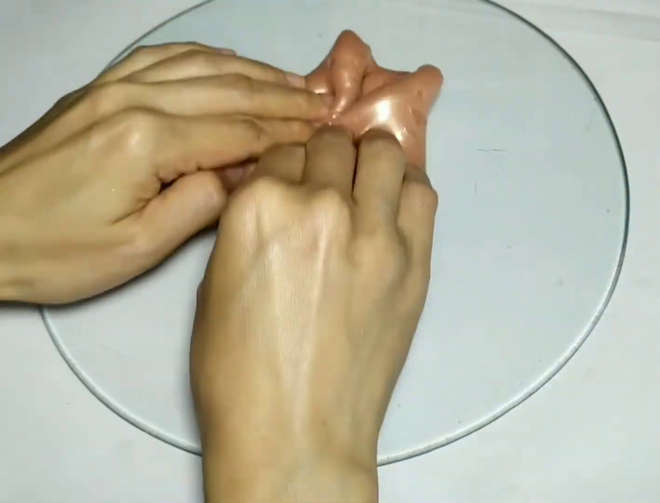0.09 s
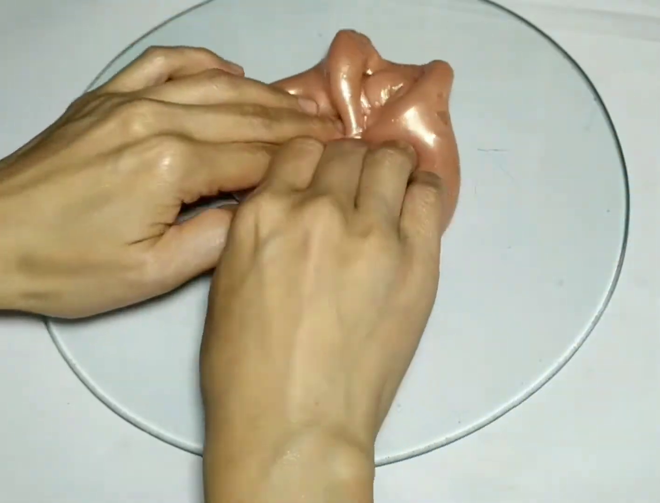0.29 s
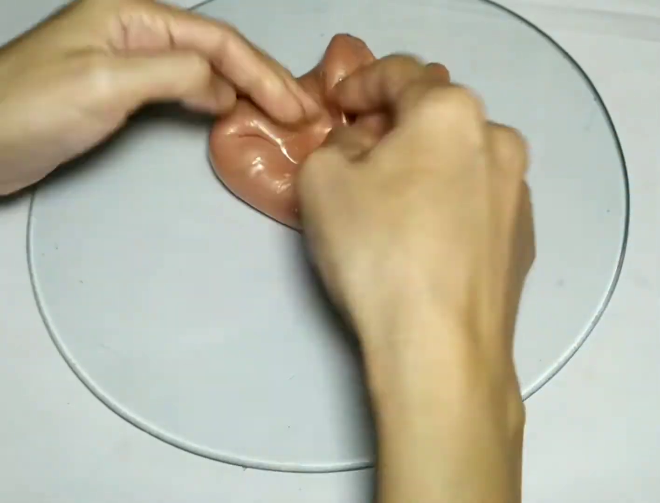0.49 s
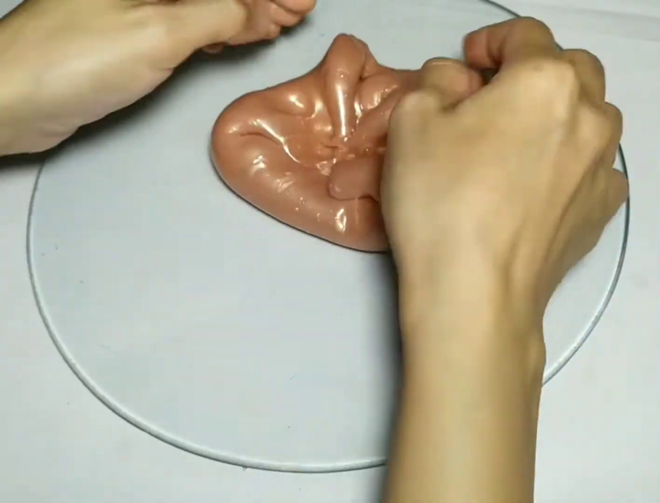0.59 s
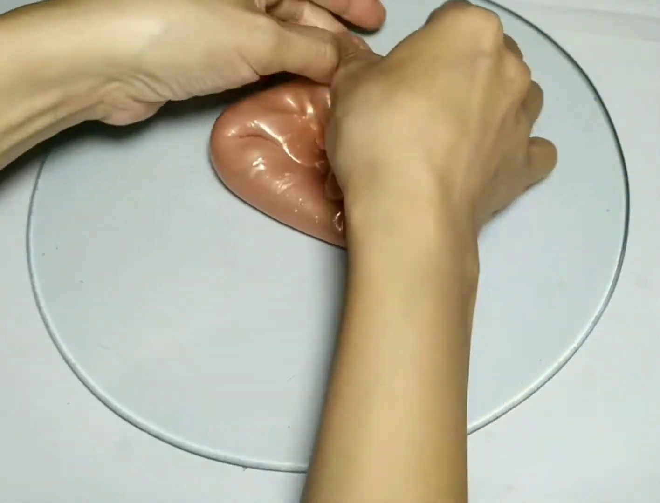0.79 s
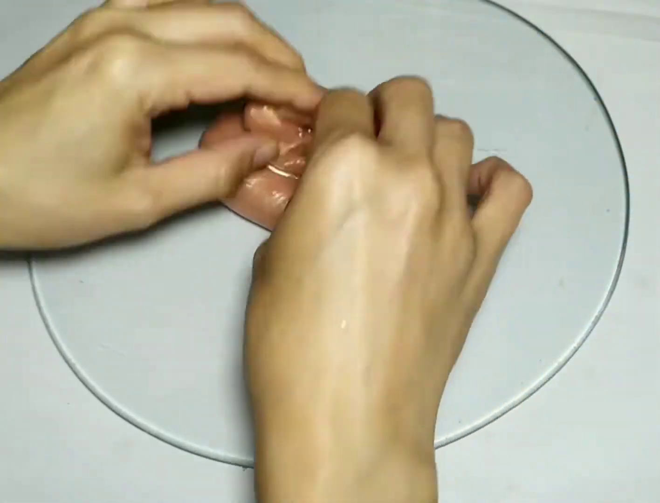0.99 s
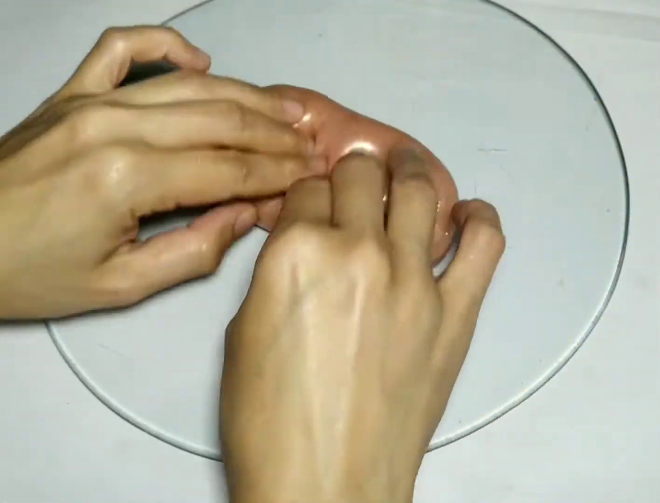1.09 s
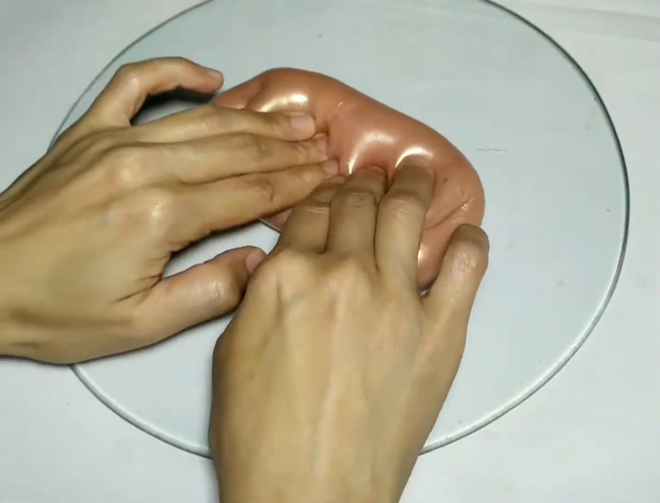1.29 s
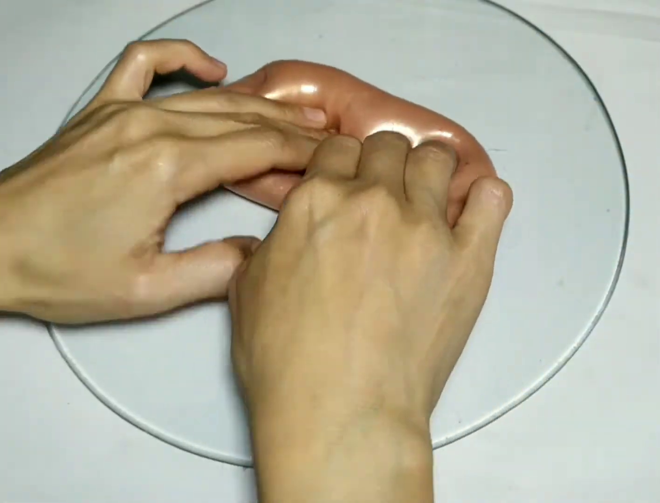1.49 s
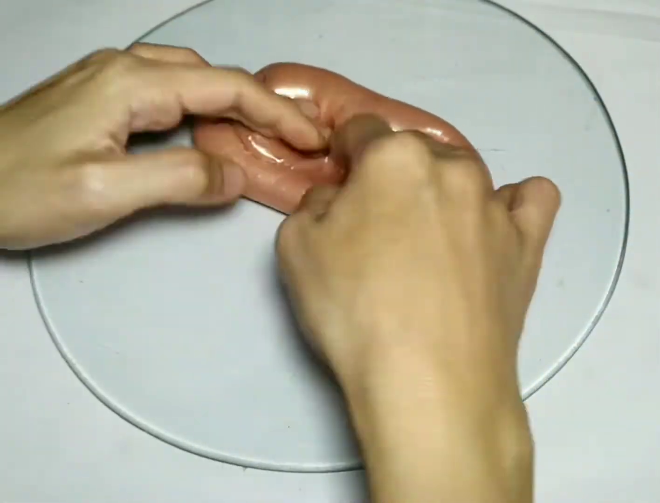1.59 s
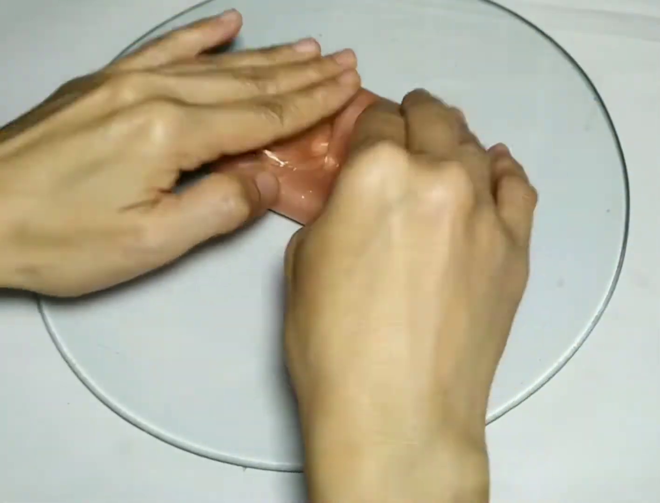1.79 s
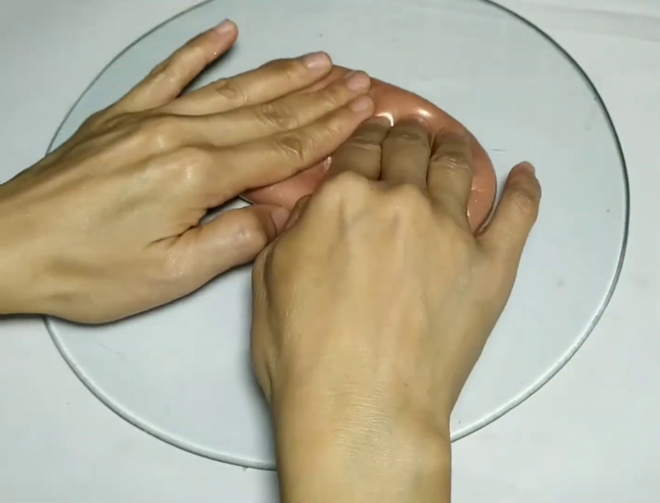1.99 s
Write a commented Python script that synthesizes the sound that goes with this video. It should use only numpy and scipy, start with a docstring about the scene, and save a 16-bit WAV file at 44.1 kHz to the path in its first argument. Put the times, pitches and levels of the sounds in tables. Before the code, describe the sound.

Hands fold gooey slime on a glass plate, with tiny sharp clicks and a fat wet pop

```python
"""A low, humming rumble, faint hiss and tiny ticks run throughout, while hands knead sticky slime on a glass plate.
Tiny bubbles snap as short noise sprays with a dull knock; larger air pockets pop as brief rising tones.
Squelches are crackle that swells and dies away, and the hand lands with soft low thuds, one with a knock.
The small, live room answers with a few separate echoes and a fading tail of noise."""
import sys
import numpy as np
from scipy import signal
from scipy.fft import rfft, irfft
from scipy.io import wavfile

SR = 44100
rng = np.random.default_rng(int(sys.argv[2]) if len(sys.argv) > 2 else 0)


def store_pcm(level_fs):
    """Save levels as 16-bit WAV."""
    pcm = np.round(np.clip(level_fs, -1, 1) * 32767).astype(np.int16)
    wavfile.write(sys.argv[1], SR, np.atleast_2d(pcm).T)


N = 92610  # samples, 2.1 s


def undb(db):
    """Turn decibels into a gain."""
    return 10 ** (np.asarray(db) / 20)


def unit(x):
    """Scale to an average strength (rms) of 1."""
    return x / np.sqrt(np.mean(x ** 2) + 1e-30)


def over_hz(table, hz):
    """Read a (pitch, value) table at any pitch, with straight lines on a log-pitch axis."""
    table_hz, values = np.array(table, float).T
    return np.interp(np.log(np.maximum(hz, 1)), np.log(table_hz), values)


def freqs(x):
    """List the frequencies in the spectrum of x, none below 1 Hz."""
    return np.maximum(np.fft.rfftfreq(x.shape[-1], 1 / SR), 1)


def colour(x, table):
    """Make each pitch louder or softer as the table says."""
    gain = undb(over_hz(table, freqs(x)))
    return irfft(rfft(x) * gain, x.shape[-1])


def band(x, hz, octaves):
    """Keep a bell-shaped band around a pitch, at rms 1."""
    distance = np.log2(freqs(x) / hz) / octaves
    return unit(irfft(rfft(x) * np.exp(-.5 * distance ** 2), x.shape[-1]))


def fade(t, t60):
    """Die away smoothly, falling 60 dB in t60 seconds."""
    return np.exp(-np.log(1000) * t / t60)


def pan(x, db):
    """Make the left side louder than the right by db."""
    return x * undb(np.array([[db], [-db]]) / 2)


def add(out, x, start):
    """Mix x into out from a start time in seconds."""
    i = int(round(start * SR))
    n = min(x.shape[-1], N - i)
    out[:, i:i + n] += x[..., :n]


def crackle(rate, spread_db):
    """Scatter tiny one-sample ruptures of uneven strength, rate per second."""
    size = undb(spread_db * np.minimum(rng.exponential(size=N), 5))
    happens = rng.random(N) < rate / SR
    return happens * size * np.sign(rng.standard_normal(N))


# Tone balance of the low rumble: pitch_hz, relative level_db (per Hz)
RUMBLE_COLOUR = [(20, -39.5), (35, -15.5), (50, -20.5), (66, -1), (90, -9.5), (130, -11.5), (170, -8),
                 (230, -16), (330, -23), (500, -31.5), (900, -45), (2500, -72)]
# Tone balance of the hiss: pitch_hz, relative level_db (per Hz)
HISS_COLOUR = [(100, 7.5), (1000, 3), (2000, -1), (5000, -4), (9500, -2), (15000, -7), (16500, -11.5)]
# Hums, each a narrow band of noise: pitch_hz, level_db, width_hz
HUMS = [(65, -54, 6), (163, -63, 6)]
RUMBLE_DB, HISS_DB = -53, -65
RUMBLE_SIDE_DB = -13  # left-right difference, against the shared rumble


def background():
    """Low room rumble, two hums that waver because they are narrow noise, and hiss."""
    mid, side = unit(colour(rng.standard_normal((2, N)), RUMBLE_COLOUR))
    out = undb(RUMBLE_DB) * (mid + undb(RUMBLE_SIDE_DB) * np.array([side, -side]))
    for hz, db, width in HUMS:
        noise = rng.standard_normal(N)
        peak = 1 / (1 + ((freqs(noise) - hz) / width) ** 2)
        out = out + undb(db) * unit(irfft(rfft(noise) * peak, N))
    hiss = unit(colour(rng.standard_normal((2, N)), HISS_COLOUR))
    return out + undb(HISS_DB) * hiss


# How long the room rings at each pitch: pitch_hz, t60_s
ROOM_T60 = [(300, 0.29), (1300, 0.4), (3500, 0.34), (9000, 0.27), (16000, .28)]
# Tone balance of the room's tail: pitch_hz, level_db
ROOM_COLOUR = [(100, -9.5), (300, -0.5), (500, 0), (1100, -10.5), (2000, -5), (4500, -0.5), (9000, -3.5),
               (16000, -1)]
ROOM_DB, ROOM_DELAY_S, ROOM_BUILD_S = -6, .004, 0.002


def diffuse():
    """The blurred tail of many reflections: noise bands that fade at their own speeds."""
    t = np.arange(SR // 2) / SR
    noise, tail = rng.standard_normal((2, len(t))), np.zeros((2, N))
    build = 1 - np.exp(-t / ROOM_BUILD_S)
    for k, (_, t60) in enumerate(ROOM_T60):
        # Each band blends into its neighbours
        blend = [(hz, j == k) for j, (hz, _) in enumerate(ROOM_T60)]
        share = over_hz(blend, freqs(noise))
        ringing = irfft(rfft(noise) * share, len(t))
        add(tail, ringing * fade(t, t60) * build, ROOM_DELAY_S)
    tail = tail / np.sqrt(np.sum(tail ** 2))
    return colour(tail, ROOM_COLOUR) * undb(ROOM_DB)


# Separate echoes from nearby walls: delay_s, left_db, right_db
ECHOES = [(.009, -24, -20.5), (0.011, -18, -27), (0.0143, -17.5, -15.5), (.0174, -12.5, -14),
          (.0348, -21, -23)]
# Tone balance of those echoes: pitch_hz, level_db
ECHO_COLOUR = [(500, -14), (3000, -1.5), (7000, -2.5), (16000, -7)]


def through(x, response):
    """Send a sound through the first half second of a room response."""
    return signal.fftconvolve(x, response[:, :SR // 2], axes=1)[:, :N]


def room(dry):
    """Sound arrives directly, then off the walls, then as a tail fed from both sides."""
    early = np.zeros((2, N))
    for delay, left_db, right_db in ECHOES:
        add(early, undb([[left_db], [right_db]]), delay)
    same_side = through(dry, colour(early, ECHO_COLOUR) + diffuse())
    other_side = through(dry[::-1], diffuse())
    return dry + same_side + other_side


TACK_PER_S, TACK_DB, TACK_SPREAD_DB = 150, -73, 0.5
TACK_HZ, TACK_OCTAVES = 3478, 2.5


def tack():
    """Skin peels off the sticky slime in faint ticks, separate on each side."""
    ticks = np.array([crackle(TACK_PER_S, TACK_SPREAD_DB) for _ in range(2)])
    return undb(TACK_DB) * band(ticks, TACK_HZ, TACK_OCTAVES)


# Soft thuds of the hand: start_s, level_db, pitch_hz
THUDS = [(0.477, -43.5, 100.8), (.713, -36, 90), (1.885, -47.5, 95)]
THUD_T60_S, THUD_ATTACK_S = 0.265, 0.00374


def thuds():
    """The hand pushes the slime against the plate and table, giving a short low tone."""
    out, t = np.zeros((2, N)), np.arange(SR // 2) / SR
    shape = fade(t, THUD_T60_S) * (1 - np.exp(-t / THUD_ATTACK_S))
    for start, db, hz in THUDS:
        add(out, undb(db) * np.sin(2 * np.pi * hz * t) * shape, start)
    return out


GRAINS_PER_S, GRAIN_SPREAD_DB = 2500, 3
SQUELCH_WIDTH = .7  # left-right difference, as a share of the common part


def grains():
    """Dense crackle, partly different at the two ears."""
    mid, side = (crackle(GRAINS_PER_S, GRAIN_SPREAD_DB) for _ in range(2))
    return mid + SQUELCH_WIDTH * np.array([side, -side])


# Air forced through a fold; swell_s and release_s are the times for a 20 dB rise and fall:
# peak_s, fizz_db, swell_s, release_s, fizz_pitch_hz, fizz_spread_octaves, gurgle_db
SQUELCHES = [(.198, -67, 0.033, .03, 4000, 1.34, -58), (.473, -48.5, 0.0312, 0.0368, 8000, 0.57, -53.5),
             (.505, -52, 0.0419, 0.0625, 6500, 0.513, -54.5),
             (0.523, -46.5, 0.0345, 0.03, 7000, 0.517, -62), (1.409, -70.5, 0.053, 0.15, 3000, 1.1, -66.5),
             (1.614, -50.5, 0.044, .035, 7500, .7, -54.5), (1.647, -42, 0.0244, 0.025, 6500, .8, -43),
             (1.655, -36, 0.0166, 0.0232, 4800, 1.11, -36), (2.088, -64, .09, 0.044, 4800, 0.457, -63.5)]
# Tone balance of the gurgle: pitch_hz, relative level_db (per Hz)
GURGLE_COLOUR = [(150, -11), (330, -4), (550, -1), (1000, -2.5), (1350, -10.5), (1900, -5.5), (2500, -12),
                 (3300, -16.5), (8000, -42.5)]


def squelches():
    """A fold is pressed shut: fine fizz and a lower gurgle swell up, then die away."""
    out, t = np.zeros((2, N)), np.arange(N) / SR
    for peak, fizz_db, swell, release, hz, octaves, gurgle_db in SQUELCHES:
        fizz = undb(fizz_db) * band(grains(), hz, octaves)
        gurgle = undb(gurgle_db) * unit(colour(grains(), GURGLE_COLOUR))
        swell_shape = undb(-20 * np.maximum((peak - t) / swell, (t - peak) / release))
        out += (fizz + gurgle) * swell_shape
    return out


# Air pockets popping, and at 0.7148 s the low knock of the hand's thud:
# start_s, level_db, pitch_hz, left_minus_right_db
POPS_AND_KNOCK = [(0.1817, -51, 1040, 10), (.5002, -36.5, 958, 1), (0.7147, -49, 450.7, 0),
                  (1.189, -54.5, 923, 3), (1.6530, -28, 1189, -4.5), (1.6570, -18.5, 959.6, 3)]
# Tones inside one pop or the knock: multiple of its pitch, relative level_db, t60_s
POCKET_TONES = [(1, 2, 0.021), (1.66, -3, 0.0099), (2.36, -9, .009), (3.45, -14, .009), (.73, -12, .03)]
POP_ATTACK_S = .0006
POP_RISE, POP_RISE_T60_S = .06, 0.02062  # pitch climbs by this share, settling over this time
POP_LAG_S = 0.0001482  # these reach the right side first


def pops_and_knock():
    """A pocket rings briefly, rising as its hole widens; the thud's knock uses the same tones."""
    out, t = np.zeros((2, N)), np.arange(SR // 10) / SR
    attack = 1 - np.exp(-t / POP_ATTACK_S)
    for start, db, hz, pan_db in POPS_AND_KNOCK:
        pitch = hz * (1 + POP_RISE * (1 - fade(t, POP_RISE_T60_S)))
        phase = 2 * np.pi * np.cumsum(pitch) / SR
        ring = sum(undb(tone_db) * np.sin(multiple * phase) * fade(t, t60)
                   for multiple, tone_db, t60 in POCKET_TONES)
        left, right = pan(undb(db) * ring * attack, pan_db)
        add(out[:1], left, start + POP_LAG_S)
        add(out[1:], right, start)
    return out


LEAD = 64  # samples of run-in before a snap
SPRAY_DB, SPRAY_T60_S = -9.5, 0.01019


def burst(t, count=4):
    """Fading noise, made equally strong at every pitch and faded again, a few times over."""
    x = rng.standard_normal((2, len(t))) * fade(t, SPRAY_T60_S)
    for _ in range(count):
        even = irfft(np.exp(1j * np.angle(rfft(x))), len(t))
        x = even * fade(t, 2 * np.pi * SPRAY_T60_S)
    return np.pad(x, ((0, 0), (LEAD, 0)))


# Bubble snaps: start_s, level_db, pitch_hz, spray_spread_octaves, left_minus_right_db
SNAPS = [(0.2382, -10, 10340, 0.494, 2), (.4678, -44.5, 7330, 0.275, 2), (0.4726, -53.5, 6400, 0.16, 7),
         (.5145, -49.5, 5600, 0.19, -4), (0.5264, -50.5, 6630, 0.21, 2.5), (0.5665, -50.5, 14040, 0.18, 7),
         (0.5709, -55, 13900, .12, 3.5), (.7148, -58, 4200, 1.2, 0), (1.1479, -46, 10280, 0.97, -2.5),
         (1.1764, -55, 9600, 0.47, -8), (1.2003, -37.5, 12320, 0.85, 5.5),
         (1.2888, -57.5, 8000, 0.49, -1.5), (1.6073, -53, 4900, .7, -3), (1.6524, -35, 5980, 1, -2.5),
         (1.6564, -33.5, 4430, 0.965, 1)]
CRACK_DB, CRACK_HZ, CRACK_OCTAVES = -19, 2302.5, 1.332  # mid-range part, level against the main spray
KNOCK_HZ, KNOCK_DB, KNOCK_T60_S = 800, -11.5, 0.0058  # dull recoil of the slime
SNAP_LAG_S = .0003  # snaps reach the left side first


def snaps():
    """A tiny bubble bursts: a very short spray around its pitch, and the slime recoils."""
    out, t = np.zeros((2, N)), np.arange(1024) / SR
    knock = undb(KNOCK_DB) * np.sin(2 * np.pi * KNOCK_HZ * t) * fade(t, KNOCK_T60_S)
    knock = np.pad(knock, (LEAD, 0))
    for start, db, hz, octaves, pan_db in SNAPS:
        noise = burst(t)
        crack = undb(CRACK_DB) * band(noise, CRACK_HZ, CRACK_OCTAVES)
        spray = undb(SPRAY_DB) * (band(noise, hz, octaves) + crack)
        left, right = pan(undb(db) * (spray + knock), pan_db)
        add(out[:1], left, start - LEAD / SR)
        add(out[1:], right, start - LEAD / SR + SNAP_LAG_S)
    return out


def scene():
    """The slime sounds in their room, over the background."""
    slime = tack() + thuds() + squelches() + pops_and_knock() + snaps()
    return background() + room(slime)


TOP_HZ = 16000


def record(dry):
    """Clip at full scale, then cut steeply above the top pitch."""
    top_cut = signal.ellip(10, .2, 80, TOP_HZ, fs=SR, output="sos")
    return signal.sosfilt(top_cut, np.clip(dry, -1, 1))


dry = scene()
out = record(dry)
store_pcm(out)
```